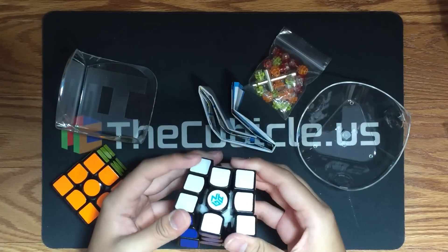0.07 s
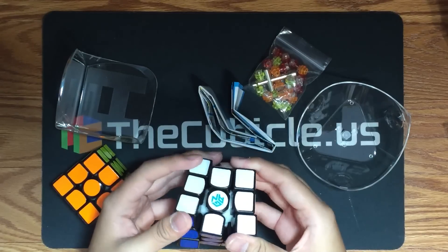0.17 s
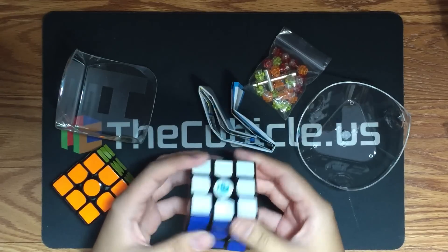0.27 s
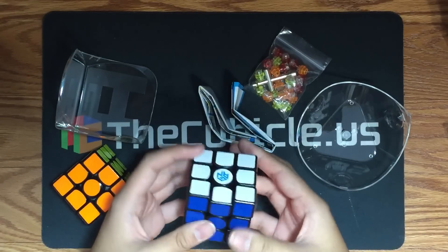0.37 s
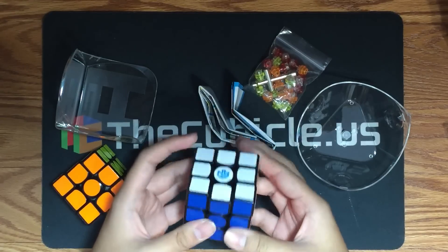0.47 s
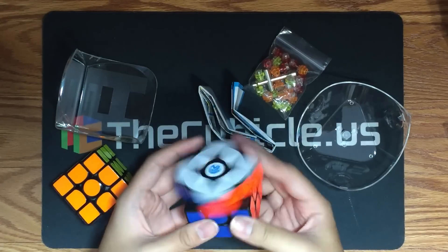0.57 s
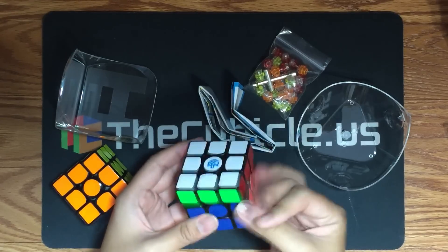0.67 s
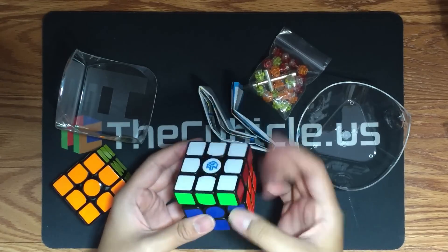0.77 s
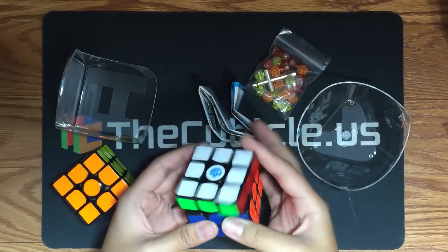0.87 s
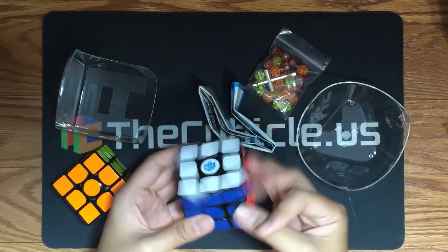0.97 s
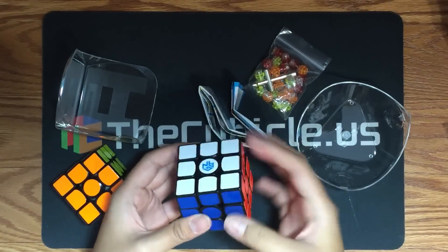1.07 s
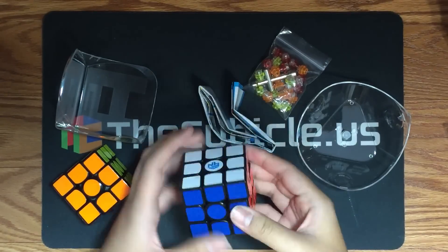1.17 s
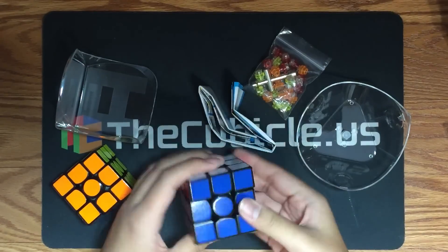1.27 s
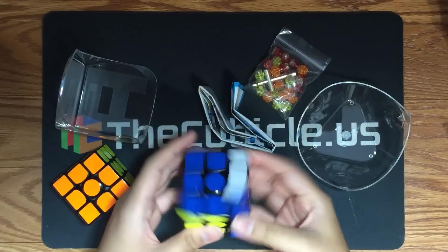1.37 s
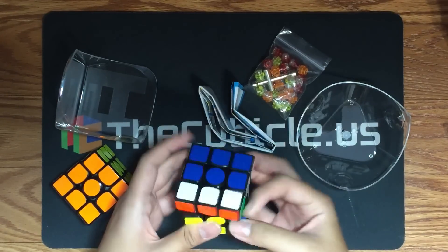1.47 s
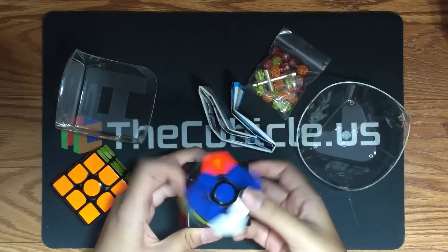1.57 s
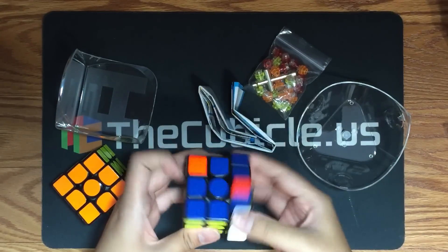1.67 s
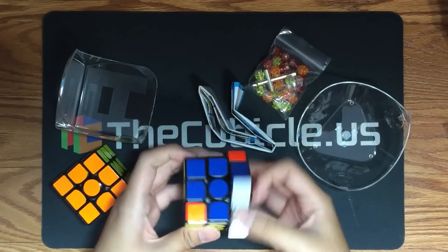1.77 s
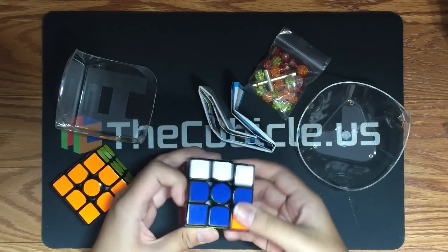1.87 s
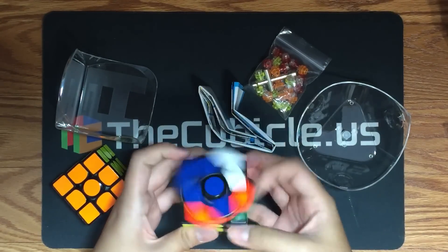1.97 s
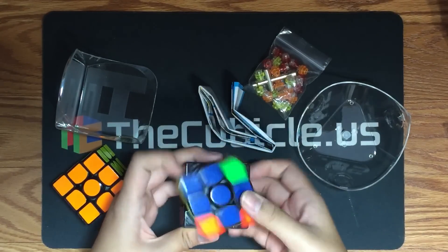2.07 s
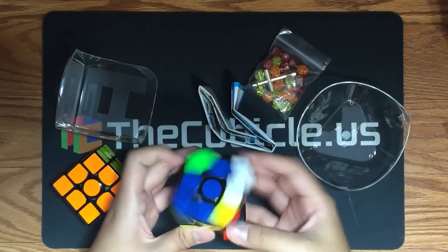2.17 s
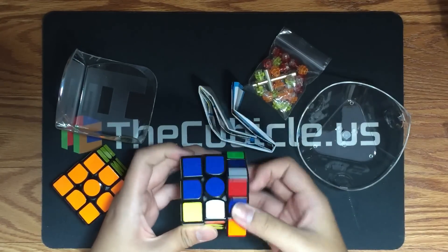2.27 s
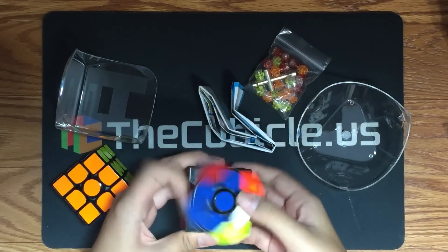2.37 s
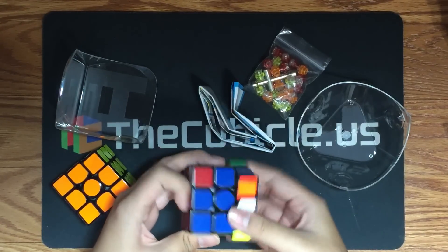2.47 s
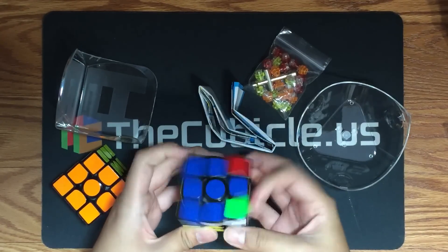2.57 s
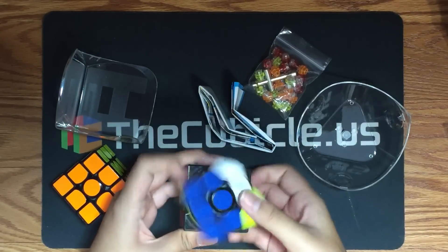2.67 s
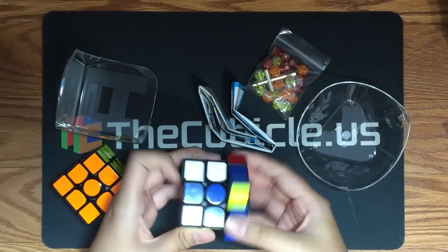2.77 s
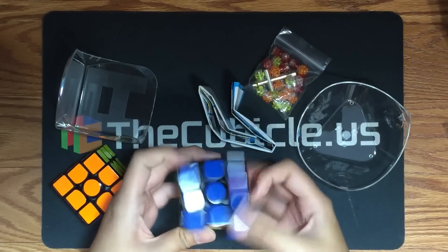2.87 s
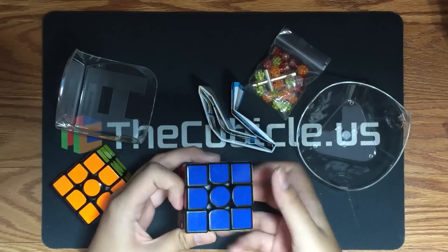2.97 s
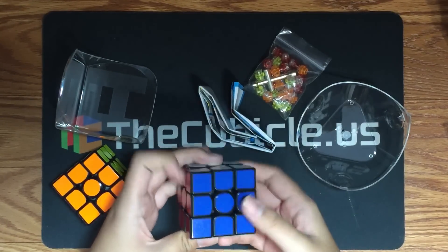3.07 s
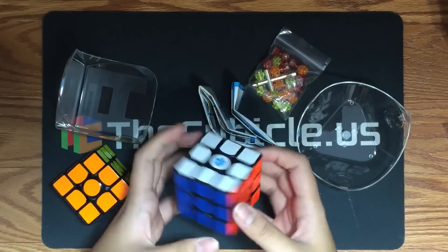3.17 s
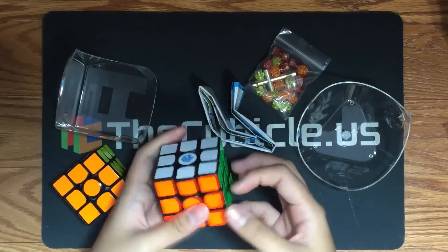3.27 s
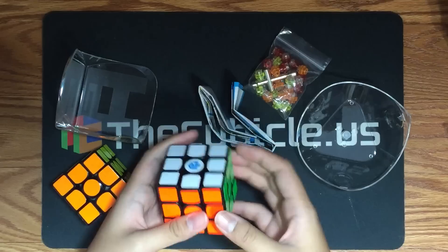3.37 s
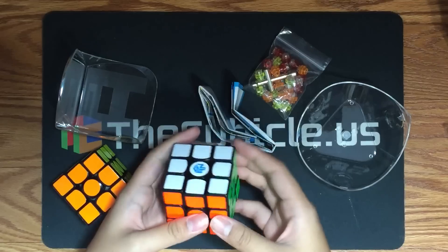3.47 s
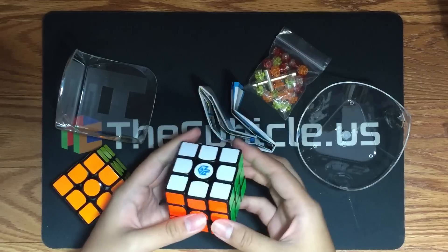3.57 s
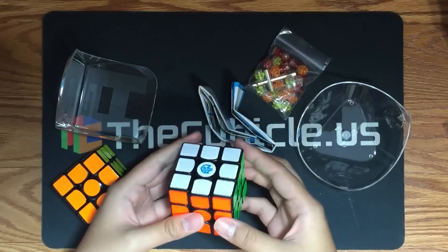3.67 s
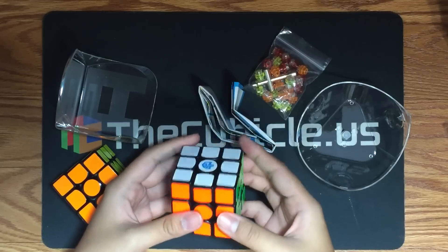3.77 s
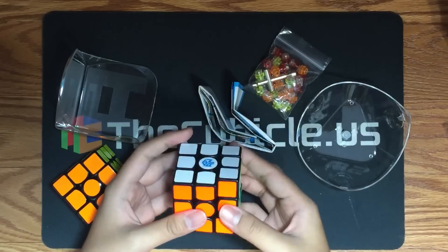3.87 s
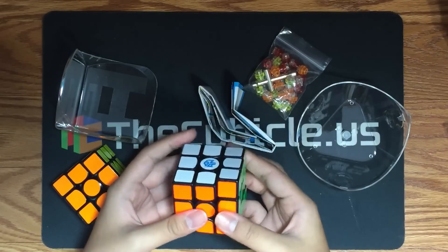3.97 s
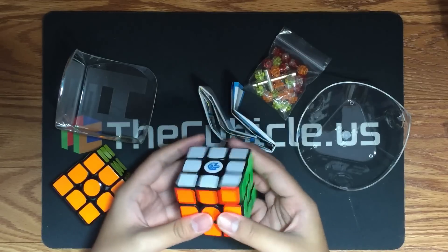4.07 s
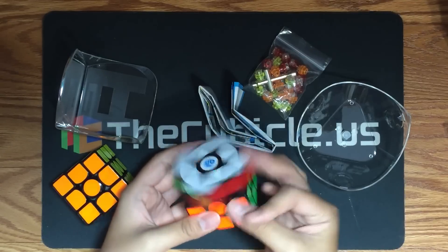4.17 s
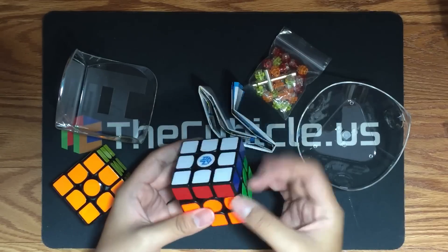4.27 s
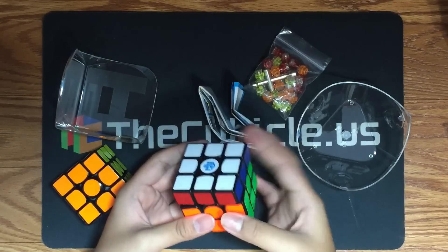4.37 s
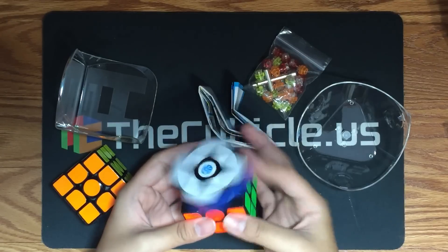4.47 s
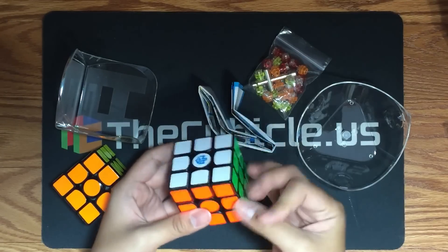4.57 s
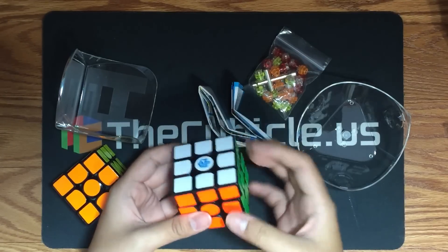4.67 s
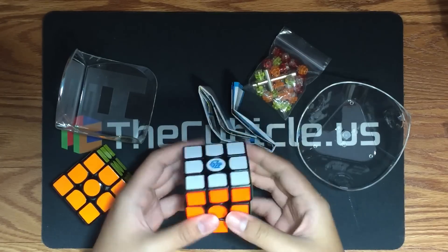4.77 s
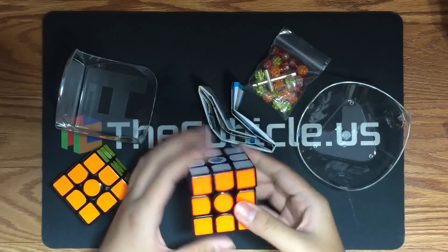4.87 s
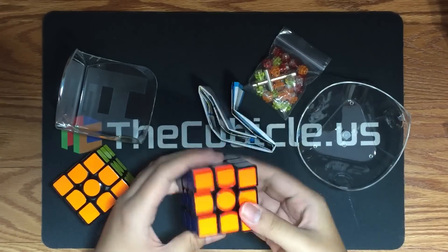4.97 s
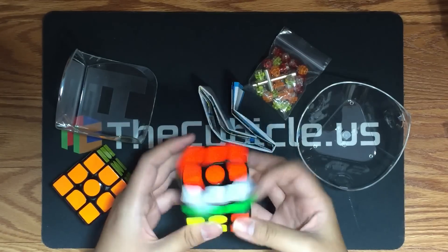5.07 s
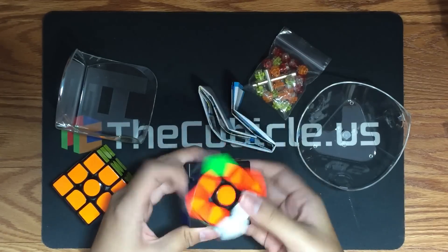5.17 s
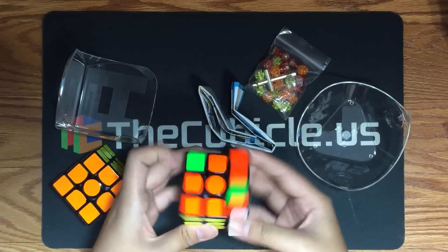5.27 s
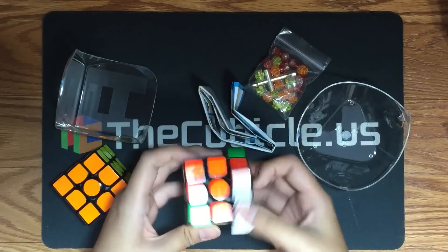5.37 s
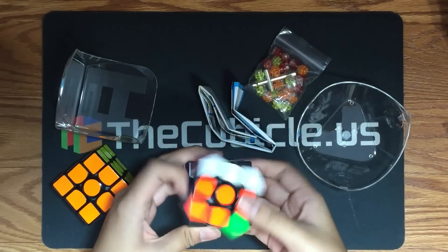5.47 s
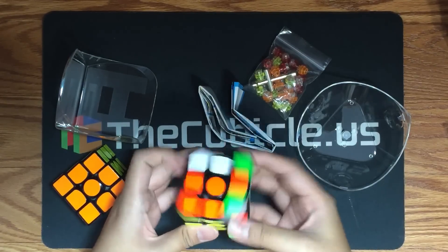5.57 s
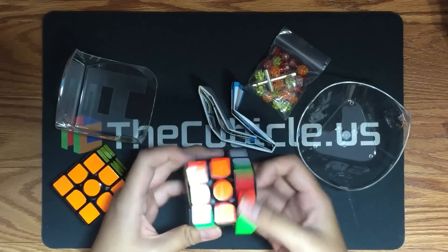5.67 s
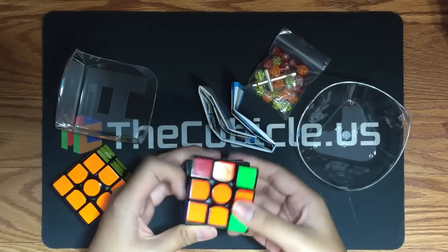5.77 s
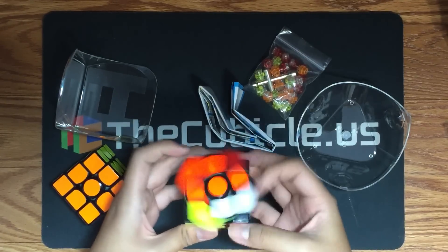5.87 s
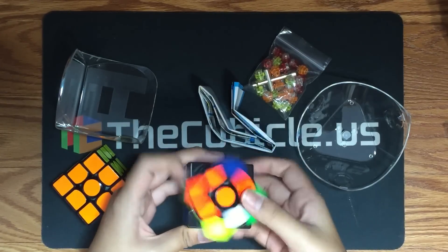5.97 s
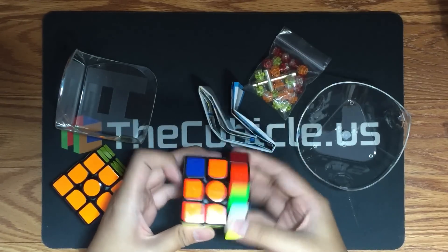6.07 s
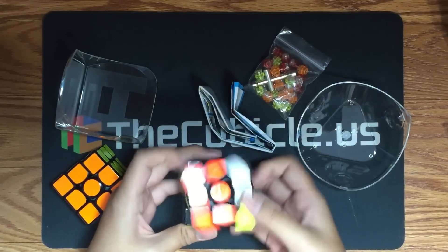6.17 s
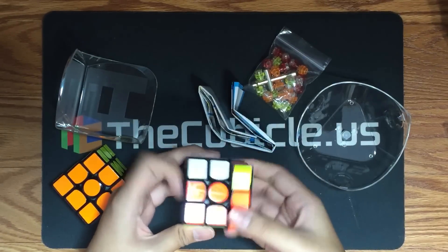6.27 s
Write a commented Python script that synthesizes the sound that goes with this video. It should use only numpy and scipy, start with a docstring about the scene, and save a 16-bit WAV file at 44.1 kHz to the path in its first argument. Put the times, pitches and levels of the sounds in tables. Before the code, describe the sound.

Fast hollow plastic clacks and short scrapes from a hand-turned puzzle cube, pausing midway, then resuming over a faint low hum.

```python
"""Fast plastic clicks and snaps close to the microphone: a puzzle cube turned by hand over a desk mat.
Each knock is a short noise rattle ringing the hollow pieces; grainy filtered hiss is their faces sliding.
Wrists thump the desk now and then, as low sine swings with a sagging pitch.
A quiet room answers with a short noise tail; far away an appliance hums and rumbles over the room's hush."""
import sys
import numpy as np
from scipy import signal
from scipy.fft import rfft, irfft, next_fast_len
from scipy.io import wavfile
from scipy.ndimage import uniform_filter1d, map_coordinates

SR = 44100
rng = np.random.default_rng(int(sys.argv[2]) if len(sys.argv) > 2 else 0)


def log_audio(samples):
    """Write samples as a 16-bit WAV file to the path given in sys.argv[1]."""
    # one column per channel
    frames = np.atleast_2d(samples).T
    # limit to full scale, then quantise
    limited = np.clip(frames, -1, 1)
    pcm = np.round(limited * 32767).astype(np.int16)
    wavfile.write(sys.argv[1], SR, pcm)


N = 278126

# resonances of the hollow pieces: (frequency [Hz], width [Hz], strength before the ring boost [dB])
SHELL_MODES = [(1293, 68, -4.5), (1448, 23, -9), (1543, 31, -6), (1840, 11, -17), (1876, 27.6, 4.5),
               (2845, 96, -9.5), (3950, 150, -10.5), (5600, 250, -16.5), (6400, 510, -22.5),
               (6780, 47, -20.5)]


def amp(db):
    """Gain of a level in dB."""
    return 10 ** (np.asarray(db) / 20)


def unit(x):
    """Scaled to rms 1."""
    return x / np.sqrt(np.mean(x ** 2) + 1e-20)


def along(points, hz):
    """Values of (Hz, value) points, interpolated on a log frequency axis."""
    f, v = np.transpose(points)
    return np.interp(np.log(hz + 1), np.log(f + 1), v)


def wobble(rate):
    """A smooth random curve through normal draws, rate knots a second."""
    knots = rng.standard_normal(int(N * rate / SR) + 4)
    return map_coordinates(knots, [np.arange(N) * rate / SR])


def filtered(x, response):
    """x filtered by a response given as a function of frequency in Hz."""
    n = x.shape[-1]
    padded = next_fast_len(n + 4096)
    spectrum = rfft(x, padded) * response(np.fft.rfftfreq(padded, 1 / SR))
    return irfft(spectrum, padded)[..., :n]


def resonance(hz, centre, width):
    """Response of one damped mode, 1 at its centre frequency."""
    return 1j * hz * width / (centre ** 2 - hz * hz + 1j * hz * width)


def cube(hz, ring_db, mode_db=0):
    """Response of the plastic: the broad colour of a contact with the shell modes ringing on top."""
    # broad colour of a plastic contact: (frequency [Hz], relative density [dB per Hz])
    contact_colour = [(240, -45.5), (400, -13), (676, -15.5), (1140, -0.5), (1270, 3), (2180, 1), (2840, 1),
                      (4310, -1), (5690, 1), (8500, -2), (10400, -9), (15000, -7.5), (16000, -14.5)]
    centre, width, db = np.transpose(SHELL_MODES)[..., None]
    ringing = amp(ring_db + db.T + mode_db) @ resonance(hz, centre, width)
    return amp(along(contact_colour, hz)) * (1 + ringing)


def clicks():
    """Each knock is a rattle of tiny impacts that builds up, peaks and rings the shell at new strengths."""
    # pieces knocking together: (time of peak [s], level of the middle band [dB],
    # hollow low band [dB against that level], pitch of the struck piece [Hz], rattle t60 [s])
    knock_table = [(0.013, -49.5, -10, 7000, 0.049), (0.0227, -50.5, -7, 2700, 0.033),
                   (0.1728, -51, -10, 4060, 0.031), (0.1913, -56.5, 2, 2930, 0.059),
                   (0.2096, -52, -1.5, 2410, 0.03), (0.2789, -52.5, -11, 5940, 0.048),
                   (0.2975, -45, -18, 4900, 0.042), (0.319, -47, -9, 2800, 0.057),
                   (0.344, -42.5, -8, 3600, 0.034), (0.3655, -43, -4, 3880, 0.053),
                   (0.374, -25, -8, 6560, 0.05), (0.6013, -56.5, -8, 4360, 0.048),
                   (0.6137, -59.5, 3, 5330, 0.054), (0.6567, -55, 10, 6030, 0.042),
                   (0.6755, -43.5, 2, 5660, 0.048), (0.696, -38.5, -6, 2300, 0.059),
                   (0.7527, -39, -2, 3700, 0.094), (0.7679, -36, 1, 5830, 0.075),
                   (0.7794, -34, -5, 2990, 0.026), (0.9673, -41, -5.5, 4200, 0.052),
                   (0.998, -34, -5, 4000, 0.061), (1.0136, -33.5, -1, 5660, 0.048),
                   (1.03, -35.5, -2, 4010, 0.051), (1.044, -36.5, -8, 5900, 0.039),
                   (1.068, -37, -3, 2520, 0.055), (1.0827, -44, 2.5, 2740, 0.051),
                   (1.2242, -59, 4, 2780, 0.026), (1.2434, -56, -16, 5810, 0.077),
                   (1.2736, -41, -23, 5880, 0.024), (1.3716, -61, -13, 6030, 0.03),
                   (1.3966, -56.5, -12, 6520, 0.034), (1.4399, -58.5, 9, 2230, 0.044),
                   (1.4827, -43.5, -7, 4010, 0.079), (1.4897, -39.5, 1, 2230, 0.048),
                   (1.5086, -39.5, -7, 2710, 0.041), (1.539, -21, -9.5, 6300, 0.076),
                   (1.5447, -22, -5.5, 6260, 0.025), (1.6312, -17, -7.5, 5300, 0.027),
                   (1.6743, -33, -2.5, 5730, 0.06), (1.7304, -43.5, -0.5, 5300, 0.06),
                   (1.7547, -41, 3, 3000, 0.06), (1.7809, -41, -3, 4480, 0.041),
                   (1.8162, -23, -13, 3850, 0.09), (1.8663, -33.5, -8, 6600, 0.09),
                   (1.93, -41.5, -5, 6090, 0.048), (1.9524, -29.5, -2.5, 2900, 0.045),
                   (2.0089, -40.5, -4, 2800, 0.037), (2.036, -33, -17, 5430, 0.042),
                   (2.0616, -32, -8, 4660, 0.048), (2.0738, -25, -12.5, 2740, 0.076),
                   (2.1293, -40.5, -2, 2200, 0.065), (2.181, -38.5, -8, 2840, 0.042),
                   (2.2088, -35.5, -7, 5700, 0.06), (2.2254, -30.5, -2, 3500, 0.033),
                   (2.2834, -19, -11.5, 5450, 0.06), (2.287, -16, -8, 5800, 0.052),
                   (2.2939, -23, -19, 4220, 0.06), (2.3374, -28, -5.5, 4480, 0.074),
                   (2.3672, -37, -7, 2420, 0.048), (2.3791, -41.5, -4, 3060, 0.06),
                   (2.4919, -31.5, -6, 2930, 0.0336), (2.508, -32.5, -4, 5900, 0.0485),
                   (2.5217, -29, -4, 3130, 0.029), (2.5892, -41.5, 1.5, 3790, 0.0595),
                   (2.6209, -31.5, -13, 6630, 0.07), (2.6484, -25, -10.5, 2800, 0.11),
                   (2.6768, -27.5, -8, 2880, 0.06), (2.7229, -30, -13, 6540, 0.045),
                   (2.7368, -38, -6, 5300, 0.06), (2.777, -33, -6, 2630, 0.054),
                   (2.797, -31.5, -5.5, 6560, 0.032), (2.847, -45, -9, 2890, 0.06),
                   (2.8663, -42, 1.5, 6090, 0.066), (2.8953, -35, -8.5, 6610, 0.051),
                   (2.925, -33, -20, 2760, 0.071), (2.9396, -26, -16, 2850, 0.048),
                   (2.9624, -26.5, -14, 2940, 0.073), (2.9778, -22.5, -10, 3340, 0.053),
                   (2.9948, -21, -12, 3850, 0.055), (3.0022, -12.5, -18, 6000, 0.039),
                   (3.1167, -51.5, -4, 2390, 0.06), (3.1458, -40.5, -10, 7990, 0.041),
                   (3.2082, -52, 2, 2220, 0.049), (3.2223, -44.5, -3.5, 4480, 0.031),
                   (3.3773, -57.5, -7, 5680, 0.06), (3.4087, -46, -10, 5340, 0.041),
                   (3.4374, -53.5, -18, 2730, 0.028), (3.564, -51.5, -17, 5490, 0.0089),
                   (3.9129, -43.5, -1.5, 6140, 0.0237), (3.9319, -53.5, -1, 2750, 0.058),
                   (4.069, -65, -5.5, 2260, 0.052), (4.174, -51, 1.5, 2260, 0.048),
                   (4.2036, -35.5, -3, 3070, 0.083), (4.2281, -34, -2.5, 5680, 0.072),
                   (4.2765, -43.5, -3, 6180, 0.0315), (4.3131, -44, 1.5, 6070, 0.055),
                   (4.337, -32, -10, 3100, 0.016), (4.5376, -50, 0, 3040, 0.039),
                   (4.559, -47, 4, 2760, 0.043), (4.5674, -36.5, -1, 5260, 0.044),
                   (4.5856, -36, 2, 3600, 0.049), (4.6074, -36.5, -0.5, 5730, 0.042),
                   (4.626, -38.5, -4, 5730, 0.057), (4.653, -34, -5, 6300, 0.037),
                   (4.8356, -65, -12, 6650, 0.028), (4.8602, -57.5, 2.5, 3640, 0.077),
                   (5.026, -55, -17, 3600, 0.013), (5.0707, -55.5, -1, 2820, 0.048),
                   (5.0859, -45, 0, 2900, 0.048), (5.1036, -31, -8.5, 3800, 0.048),
                   (5.1531, -29, -6, 3980, 0.048), (5.1633, -24, -9, 2970, 0.067),
                   (5.2188, -33.5, -16, 5580, 0.039), (5.2352, -24.5, -2, 2690, 0.041),
                   (5.2928, -36.5, -2.5, 2840, 0.048), (5.3078, -33, -6, 2780, 0.067),
                   (5.3797, -36.5, -4.5, 3820, 0.06), (5.405, -37.5, -3, 6850, 0.035),
                   (5.443, -34, -9, 6630, 0.048), (5.456, -26, -6.5, 5700, 0.033),
                   (5.4938, -38, -7, 2730, 0.059), (5.5123, -35.5, -12, 6720, 0.038),
                   (5.5292, -34.5, -10, 2840, 0.059), (5.553, -35, -12, 2780, 0.048),
                   (5.5632, -33, -1, 6600, 0.034), (5.6444, -31, -3, 2900, 0.028),
                   (5.6588, -31, -9, 5380, 0.027), (5.6998, -39.5, -4, 2700, 0.074),
                   (5.7129, -26, -6, 2960, 0.065), (5.7502, -35.5, -8, 7240, 0.063),
                   (5.7915, -37, -17, 2820, 0.048), (5.8209, -35, -11, 2260, 0.052),
                   (5.8393, -31, -2.5, 5500, 0.049), (5.9042, -26, -8, 5700, 0.06),
                   (5.9096, -22, -8.5, 2940, 0.052), (5.962, -31.5, -7, 2840, 0.089),
                   (5.9769, -24, -10.5, 5540, 0.06), (5.996, -26.5, -3, 3040, 0.04),
                   (6.0207, -30.5, -12, 2900, 0.072), (6.058, -49, 0, 2650, 0.048),
                   (6.0768, -34.5, -11, 2680, 0.065), (6.0929, -31.5, -9, 4060, 0.048),
                   (6.1166, -40.5, 3, 2860, 0.033), (6.1498, -42.5, -6, 2820, 0.04),
                   (6.1826, -39.5, -8, 2800, 0.025), (6.1912, -36, -5, 6140, 0.04),
                   (6.227, -30.5, -6, 5530, 0.05), (6.2384, -35.5, -1, 4330, 0.04),
                   (6.2787, -31, -5, 3120, 0.038), (6.2925, -34.5, -1.5, 3550, 0.073)]
    lead_s = .0013  # the build-up rises 7 dB in this time
    edge_db, edge_spread_db = -7.5, 4.5  # sharp high band against the level, and how that varies
    snap_db, snap_grows = 9, 0.11  # hard contact in the strongest knock; dB lost per dB of a weaker one
    s, db, hollow_db, piece_hz, t60 = np.transpose(knock_table)[..., None]
    before = SR // 40  # samples kept ahead of the peak
    t = (np.arange(SR // 9) - before) / SR

    chance = rng.standard_normal((len(s), 2 * len(t) + len(SHELL_MODES) + 1))
    grit, spikes, modes, edge = np.split(chance, [len(t), 2 * len(t), -1], axis=1)
    fade_db = np.where(t < 0, 7 * t / lead_s, -60 * t / np.clip(t60, .004, .1))
    # a strong knock peaks in one hard contact
    strongest_db = np.clip(snap_db + snap_grows * (db - db.max()), 0, None)
    blow_db = strongest_db * np.exp(-(t / 0.00025) ** 2)
    rattle = grit * amp(2.5 * spikes + fade_db + blow_db)

    def struck(hz):
        # the struck piece adds one broad, short ring of its own
        piece = 1 + amp(5) * resonance(hz, piece_hz, .12 * piece_hz)
        return cube(hz, 1.7, 3.5 * modes) * piece

    def loudest(x):
        # highest rms over 110 samples, about 2.5 ms
        return np.sqrt(uniform_filter1d(x ** 2, size=110, axis=1).max(axis=1, keepdims=True))

    body = filtered(rattle, struck)
    low = filtered(body, lambda hz: 1 / (1 + (hz / 2200) ** 8))
    high = filtered(body, lambda hz: 1 - 1 / (1 + (hz / 8000) ** 8))
    middle = body - low - high
    bands = [(middle, db), (low, db + hollow_db), (high, db + edge_db + edge_spread_db * edge)]
    knock = sum(amp(level) * x / loudest(x) for x, level in bands)
    at = np.round(s * SR).astype(int) + np.arange(len(t))
    return np.bincount(at.ravel(), knock.ravel(), N + SR)[before:N + before]


def slide():
    """Faces rubbing under the knocks: hiss that catches in uneven grains, swelling and fading with each turn."""
    # layers sliding round, or only shifting faintly in the fingers: (start [s], length [s], level [dB])
    turn_table = [(0.171, 0.042, -66), (0.302, 0.1, -61), (.43, 0.062, -67.5), (.54, 0.07, -71.5),
                  (0.673, 0.048, -44), (.745, 0.034, -43), (0.986, 0.068, -45), (1.13, 0.056, -74.5),
                  (1.22, .1, -67), (1.418, .04, -66.5), (1.484, 0.064, -42), (1.618, .065, -36.5),
                  (1.752, .04, -43.5), (1.811, 0.074, -36), (1.915, 0.059, -42), (2.003, 0.11, -40),
                  (2.12, .11, -40), (2.284, .11, -41), (2.486, .05, -41), (2.56, .03, -52.5),
                  (2.623, 0.063, -36.5), (2.72, 0.028, -40), (2.77, 0.033, -35.5), (2.872, 0.07, -42.5),
                  (2.928, 0.094, -30), (3.069, 0.088, -58), (3.199, .05, -68), (3.369, 0.094, -68),
                  (4.193, 0.043, -50), (4.266, .075, -47.5), (4.567, 0.096, -44), (4.74, .025, -65.5),
                  (4.868, 0.13, -70), (5.106, .08, -38), (5.22, 0.058, -47.5), (5.285, .04, -38.5),
                  (5.375, 0.11, -42), (5.494, .09, -39.5), (5.641, .09, -42.5), (5.737, 0.052, -42),
                  (5.817, 0.036, -37.5), (5.904, 0.037, -39.5), (5.96, .08, -41.5), (6.07, 0.038, -42),
                  (6.153, 0.077, -43), (6.223, .09, -38.5)]
    speed_up, slow_down = 701, 449.5  # swell before a turn and fade after it [dB/s]
    t = np.arange(N) / SR
    power = 0
    for s, length, db in turn_table:
        swell_db = speed_up * np.clip(s - t, 0, None)
        fade_db = slow_down * np.clip(t - s - length, 0, None)
        power = power + amp(db - swell_db - fade_db) ** 2
    catching = amp(3 * wobble(90) + 3 * wobble(300) + 3 * rng.standard_normal(N))
    rub = filtered(catching * rng.standard_normal(N), lambda hz: cube(hz, 1.5)[0])
    return np.sqrt(power) * unit(rub)


def thumps():
    """A soft blow swings the desk, soon dying away; the pitch sags as the wrist sinks in."""
    # wrists on the desk: (time [s], peak level [dB], settled pitch [Hz], t60 [s])
    wrist_table = [(3.206, -37.5, 55, 0.13), (3.373, -36.5, 59, 0.28), (3.411, -39, 69, 0.073),
                   (3.699, -34.5, 55.2, .12), (3.717, -29.5, 102, 0.042), (4.344, -35, 56, 0.18),
                   (4.393, -44.5, 70, .08), (4.502, -44, 53, 0.36), (4.739, -39.5, 50, 0.47),
                   (4.796, -40, 72.8, 0.071), (4.841, -31, 54.5, 0.052), (5.527, -34.5, 63, 0.16)]
    out, t = np.zeros(N + SR), np.arange(SR // 4) / SR
    for s, db, hz, t60 in wrist_table:
        phase = 2 * np.pi * hz * (t + 0.01 * (1 - np.exp(-t / 0.0046)))
        soft_onset = (1 - np.exp(-t / 0.0043)) ** 2
        swing = -np.sin(phase) * amp(-60 * t / t60) * soft_onset
        out[round(s * SR):][:len(t)] += amp(db) * swing / np.abs(swing).max()
    return out[:N]


def room(x):
    """Each frequency of the room's answer dies at its own speed; moving hands keep changing the tail."""
    # decay of the room: (frequency [Hz], t60 [s])
    decay_table = [(500, 0.075), (2000, 0.13), (6000, 0.14), (14000, 0.051)]
    out, step = np.zeros(N + SR), SR // 8  # a new tail eight times a second
    for start in range(0, N, step):
        hz, t, z = signal.stft(rng.standard_normal(SR // 3), SR, nperseg=256)
        fading = z * amp(-60 * t / along(decay_table, hz)[:, None])
        tail = signal.istft(fading, SR, nperseg=256)[1]
        answer = signal.fftconvolve(x[start:start + step], tail / np.linalg.norm(tail))
        out[start + 130:][:len(answer)] += answer  # arrives about 3 ms late
    return out[:N]


def background():
    """Steady room hush, and a far low drone that swells and sinks: lumpy rumble with an unsteady hum."""
    # colour of the hush: (frequency [Hz], relative density [dB per Hz])
    hush_colour = [(150, -24), (200, -13), (250, -10), (320, -1.5), (400, -12.5), (480, -23.5), (680, -25),
                   (1500, -27), (3000, -30.5), (6000, -35.5), (9000, -38.5), (16000, -43)]
    # colour of the rumble: (frequency [Hz], relative density [dB per Hz])
    rumble_colour = [(25, -19.5), (45, -1), (65, 3), (125, -8), (200, -25.5)]
    # hum tones: (frequency [Hz], middle level [dB against the drone])
    hum_tones = [(59.5, -3), (119.5, -9), (240, -18.5), (320, -21.5)]
    # drone swelling and sinking: (time [s], level [dB])
    drone_levels = [(0.0, -53.5), (0.39, -55), (1.32, -55.5), (1.76, -55.5), (2.72, -54), (2.93, -60),
                    (3.11, -53), (3.28, -52.5), (4.11, -56.5), (4.69, -53), (5.37, -57), (5.62, -53),
                    (6.04, -48.5), (6.31, -54)]
    t = np.arange(N) / SR
    hush = unit(filtered(rng.standard_normal(N), lambda hz: amp(along(hush_colour, hz)) * (hz > 120)))
    lumpy = amp(2.2 * wobble(10)) * rng.standard_normal(N)
    rumble = unit(filtered(lumpy, lambda hz: amp(along(rumble_colour, hz)) * (hz < 260)))
    hum = 0
    for hz, db in hum_tones:
        tone = np.sqrt(2) * np.sin(2 * np.pi * hz * t + .5 * wobble(7.9))
        hum = hum + amp(db + 4.7 * wobble(18)) * tone
    drone = amp(np.interp(t, *np.transpose(drone_levels))) * (rumble + hum)
    return amp(-62 + 1.7 * wobble(4.6)) * hush + drone


def scene():
    """The cube close to the microphone, its echo, the desk and the room."""
    turning = clicks() + slide()
    echo = amp(-10.5) * room(turning)
    return (turning + echo + thumps() + background())[None]


def record(dry):
    """The microphone chain cuts the deepest bass, around 26 Hz, and keeps nothing above its band limit."""
    top_hz = 15800
    return filtered(dry, lambda hz: (hz < top_hz) / (1 + (26 / (hz + 1)) ** 4))


dry = scene()
out = record(dry)
log_audio(out)
```